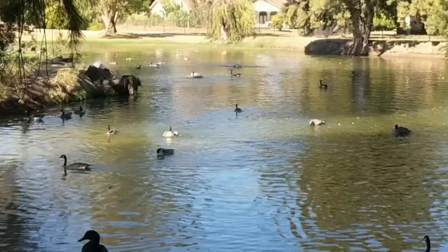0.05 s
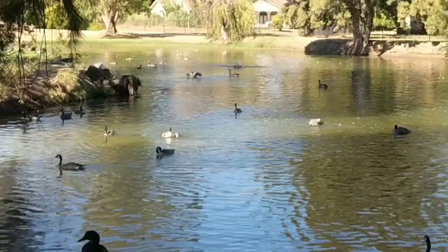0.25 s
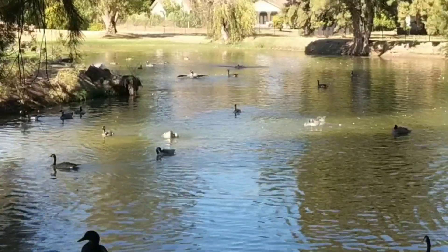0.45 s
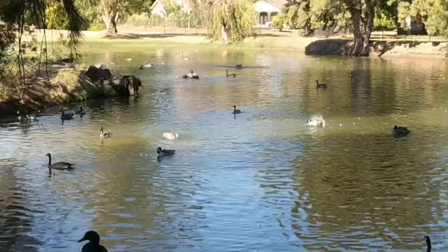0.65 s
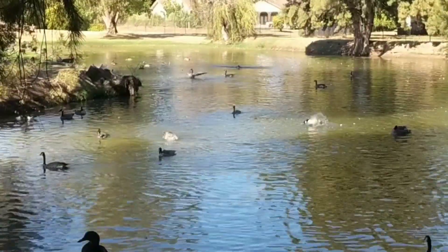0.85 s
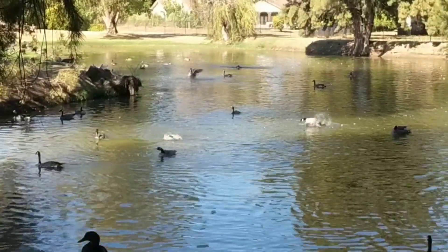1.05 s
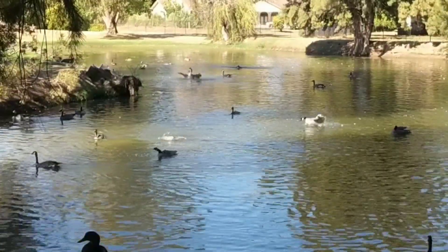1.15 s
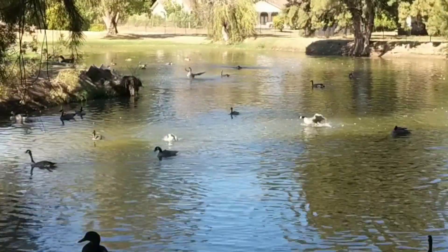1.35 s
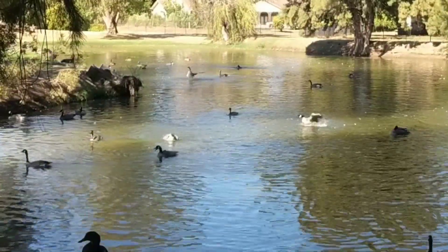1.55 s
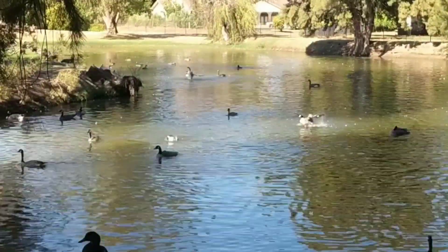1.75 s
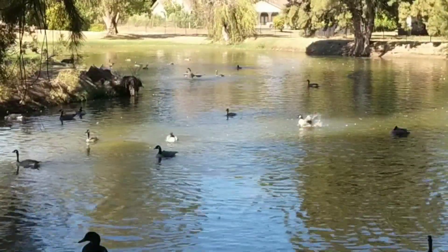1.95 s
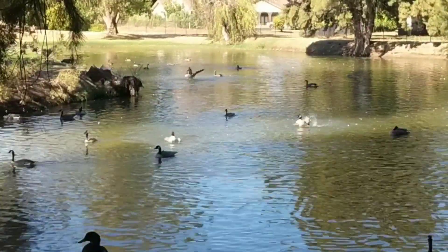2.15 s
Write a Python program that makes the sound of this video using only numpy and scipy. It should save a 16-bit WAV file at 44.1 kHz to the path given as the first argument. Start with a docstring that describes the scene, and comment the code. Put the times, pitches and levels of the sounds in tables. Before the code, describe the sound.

Geese grunt, squeal and honk twice across an outdoor pond, faintly echoed by the banks. Between the honks a bird splashes with light wing slaps, while a faint distant engine hums under quiet background noise.

```python
"""A park pond with geese. Each call starts as a low pulsed grunt that rises, then opens into a nasal honk
or breaks into a clear squeal two octaves up: pulses of the syrinx ringing the throat and bill.
A bathing bird sprays, thumps and slaps the water, and the banks and trees answer the birds.
Under a soft hush a distant engine slowly gains speed, and a puff of wind touches the microphone."""
import sys
import numpy as np
from scipy import signal
from scipy.fft import rfft, irfft, next_fast_len
from scipy.io import wavfile
from scipy.ndimage import uniform_filter1d, map_coordinates

SR = 44100
rng = np.random.default_rng(int(sys.argv[2]) if len(sys.argv) > 2 else 0)


def dump_mix(stems):
    """Bounce the given channels to the path in sys.argv[1] as a 16-bit WAV at rate SR."""
    frames = np.atleast_2d(stems).T  # one column per channel
    limited = np.clip(frames, -1, 1)  # hard clip at full scale
    pcm = np.round(limited * 32767).astype(np.int16)
    wavfile.write(sys.argv[1], SR, pcm)


N = 97020
TOP_HZ = 15700


def amp(db):
    return 10 ** (np.asarray(db) / 20)


def unit(x):
    return x / np.sqrt(np.mean(x ** 2) + 1e-20)


def along(points, hz):
    """Read (f/Hz, value) points on a log frequency axis."""
    f, v = np.transpose(points)
    return np.interp(np.log(hz + 1), np.log(f + 1), v)


def clock():
    return np.arange(N) / SR


def curves(rows):
    """One curve for each column after the time."""
    times, *columns = np.transpose(rows)
    return [np.interp(clock(), times, column) for column in columns]


def wobble(rate):
    """A smooth random curve, rate knots a second."""
    return map_coordinates(rng.standard_normal(int(N * rate / SR) + 4), [np.arange(N) * rate / SR])


def filtered(x, response):
    """Filter x by a function of frequency."""
    size = 2 * next_fast_len(N)
    return irfft(rfft(x, size) * response(np.fft.rfftfreq(size, 1 / SR)), size)[:N]


def coloured(x, points):
    """x through an EQ curve (f/Hz, level/dB), at rms 1."""
    return unit(filtered(x, lambda hz: amp(along(points, hz))))


def causal(gain):
    """The minimum-phase response with this gain: it rings only after it is struck."""
    cepstrum = irfft(np.log(np.maximum(gain, 1e-6)))
    half = len(cepstrum) // 2
    cepstrum[1:half] *= 2
    cepstrum[half + 1:] = 0
    return np.exp(rfft(cepstrum))


def body_share(hz):
    """Crossover from a call's body (1) to its treble rasp (0)."""
    return 1 / (1 + (hz / 2900) ** 8)


def band_gains(throat):
    """How much the throat passes in the body band and in the rasp band."""
    hz = np.linspace(0, SR / 2, 4097)
    power = amp(along(throat, hz)) ** 2
    return [np.sqrt(np.mean(power * (hz > lo) * (hz < hi))) for lo, hi in [(450, 1900), (3500, 8000)]]


def hush():
    """A dark bed of outdoor noise, gently wavering."""
    colour = [(20, -25), (30, -47), (48, -5.5), (70, -0.5), (95, -4), (125, -2.5), (175, -2.5), (260, -12),
              (370, -19.5), (540, -11.5), (760, -15), (1450, -16), (1850, -19.5), (2700, -20.5),
              (6900, -29), (9000, -30.5), (15500, -40.5)]  # outdoor spectrum: f/Hz, level/dB
    return amp(-53 + .7 * wobble(6.9)) * coloured(rng.standard_normal(N), colour)


def engine():
    """A distant engine hums at its rising firing rate, with two weaker partials above."""
    run_up = [(0, 100.4, -51), (.15, 106.8, -52.5), (.42, 110.5, -57), (.52, 113, -49), (.75, 116.6, -50.5),
              (.82, 115.3, -70), (.93, 118.1, -53.5), (1.3, 121.1, -56.5), (1.55, 126.8, -55),
              (1.85, 129.9, -58), (2.2, 139.7, -54)]  # engine speed and loudness: t/s, firing rate/Hz, level/dB
    rate, level_db = curves(run_up)
    phase = 2 * np.pi * np.cumsum(rate * (1 + .004 * wobble(18.36))) / SR
    hum = np.sin(phase) + amp(-8.5) * np.sin(1.45 * phase) + amp(-18) * np.sin(2 * phase)
    return amp(level_db + 1.5 * wobble(14.4)) * unit(hum)


def spray(drops_per_s=4000):
    """Droplets thrown by the bathing bird patter down as tiny clicks of uneven size."""
    swells = [(0, -83), (.3, -65), (.8, -71), (.87, -60.5), (.98, -57), (1.08, -60.5), (1.18, -59),
              (1.25, -63), (1.45, -64), (1.53, -51.5), (1.65, -69.5), (1.76, -57.5), (1.95, -52),
              (2.0, -69), (2.11, -54.5), (2.2, -62)]  # spray envelope: t/s, level/dB
    colour = [(150, 6), (280, 13.5), (420, -1), (650, 4.5), (1400, 1), (2200, -3), (4500, -4.5), (9000, -7),
              (15000, -24)]  # droplet spectrum: f/Hz, level/dB
    drops = (rng.random(N) < drops_per_s / SR) * rng.standard_normal(N)
    drops *= amp(np.minimum(rng.exponential(size=N), 4))
    level_db, = curves(swells)
    return coloured(drops, colour) * amp(level_db + 3 * wobble(30.9))


def syrinx_buzz(rows, throat, follow, jitter, shimmer_db, smear_rad, rough, hiss, crack):
    """The syrinx buzzes and puffs air through a throat that follows the pitch (0 = still, 1 = in step)."""
    t = clock()
    start, end = rows[0][0], rows[-1][0]
    pitch, body_db, rasp_db = curves(rows)
    pitch = uniform_filter1d(pitch, size=300)
    gate = np.clip(np.minimum(t - start, end - t) / .004 + .5, 0, 1)
    on = gate > 0
    cycles = np.cumsum(pitch * (1 + jitter * wobble(250)) * on) / SR
    body_gain, rasp_gain = band_gains(throat)
    body = gate * amp(body_db) / body_gain
    rasp = gate * amp(rasp_db) / rasp_gain

    harmonic = np.arange(1, 100)[:, None]
    partial_hz = harmonic * pitch[on]
    throat_hz = partial_hz * (pitch[np.argmax(body_db)] / pitch[on]) ** follow
    hz = np.linspace(0, SR / 2, 4097)
    throat_phase = np.unwrap(np.angle(causal(amp(along(throat, hz)))))
    lag = np.interp(throat_hz, hz, throat_phase) + smear_rad * rng.standard_normal(harmonic.shape)
    balance = body[on] * body_share(partial_hz) + rasp[on] * (1 - body_share(partial_hz))
    weight = amp(along(throat, throat_hz)) * balance * (partial_hz < TOP_HZ)
    partials = weight * np.cos(2 * np.pi * harmonic * cycles[on] + lag)
    buzz = np.zeros(N)
    buzz[on] = 2 * np.sqrt(pitch[on] / SR) * partials.sum(axis=0)

    air = unit(rng.standard_normal(N) * np.exp(-2 * (cycles % 1)) * gate) * np.sqrt(np.mean(gate))
    air *= 1 + crack * np.exp(-np.abs(t - start) / .022)  # hoarse for a moment as the voice breaks
    low_air = filtered(air, lambda f: amp(along(throat, f)) * body_share(f))
    high_air = filtered(air, lambda f: amp(along(throat, f)) * (1 - body_share(f)))
    return buzz * amp(shimmer_db * wobble(200)) + rough * body * low_air + hiss * rasp * high_air


def grunts():
    """Low, breathy buzzes of the syrinx lead into the honks and squeals."""
    calls = [
        [(.11, 155.5, -60, -95), (.16, 174.9, -55, -74), (.226, 180, -47.5, -66), (.232, 207, -42, -63),
         (.25, 213.4, -45.5, -62), (.262, 216, -48, -70)],
        [(.245, 159, -43, -68), (.275, 158.5, -45, -63), (.325, 159.5, -43.5, -64), (.345, 167, -42, -58),
         (.36, 178, -39.5, -58), (.38, 181, -37, -53), (.395, 186, -33.5, -52), (.407, 184, -50, -58)],
        [(.488, 171, -63, -66), (.498, 171.2, -45, -66), (.543, 176.6, -48, -62), (.567, 190.2, -40.5, -60),
         (.575, 188, -43, -47)],
        [(1.265, 172, -59, -92), (1.295, 165.9, -48, -66), (1.315, 165.4, -43, -62), (1.335, 177.8, -43, -61),
         (1.355, 188.6, -53, -60), (1.38, 200.6, -46, -59), (1.4, 201.5, -63, -70), (1.425, 202, -56, -74),
         (1.445, 187, -60, -76)],
        [(1.742, 184, -54, -66), (1.762, 172, -45.5, -63), (1.783, 169.5, -48.5, -68), (1.812, 174, -44, -60),
         (1.82, 181, -46, -58)],
    ]  # one contour a grunt: t/s, pitch/Hz, body/dB, rasp/dB
    # throat resonances with the bill nearly shut, in a plain grunt, and opening: f/Hz, level/dB
    shut = [(300, -68), (430, -7.5), (530, 1), (700, 2.5), (850, -7.5), (1050, 8), (1300, -5.5), (1550, -6),
            (1900, -22), (2300, -4.5), (2700, -14), (3300, -23), (4400, -18), (6000, -17), (8000, -16),
            (15000, -36)]
    plain = [(300, -34), (430, -7), (520, -6.5), (680, 2.5), (850, -14), (1000, 5), (1110, 6), (1280, -3),
             (1460, 8), (1650, -11), (1950, -17), (2300, -9), (2700, -9.5), (3300, -21), (4400, -14.5),
             (6000, -13), (8000, -38), (15000, -35)]
    opening = [(300, -35.5), (520, -2.5), (700, 3), (870, -3.5), (1220, 0.5), (1450, 5.5), (1750, -11),
               (2700, -21), (3300, -14), (4400, -6), (6000, -9), (15000, -30)]
    return sum(syrinx_buzz(rows, throat, follow=.15, jitter=.006, shimmer_db=1, smear_rad=1.4,
                           rough=.28, hiss=.54, crack=0)
               for rows, throat in zip(calls, [shut, plain, opening, opening, opening]))


def squeals():
    """The voice cracks and jumps two octaves to a clear, steady tone."""
    calls = [
        [(.246, 745, -46, -66), (.254, 756, -42, -71), (.275, 756, -42, -61), (.3, 750, -47, -73),
         (.32, 725, -57, -72)],
        [(.395, 822, -34, -37), (.403, 824.4, -34, -33.5), (.424, 824.4, -35, -33.5), (.44, 822, -36, -40),
         (.453, 819, -37, -45), (.459, 780, -44, -66), (.476, 765, -49, -68)],
        [(1.376, 805, -45, -70), (1.386, 816, -41, -69), (1.401, 816, -41, -70), (1.42, 770, -56, -76)],
    ]  # one contour a squeal: t/s, pitch/Hz, body/dB, rasp/dB
    # throat resonances in a soft and a loud squeal: f/Hz, level/dB
    soft = [(400, -13), (780, -6.5), (1560, -4.5), (2300, -12), (3100, -53), (4100, -4), (5000, -25),
            (6000, -11), (9000, -20), (15000, -47)]
    loud = [(400, -26), (800, -3), (1650, 3), (2450, -9), (3300, -16), (4130, -7.5), (4950, 0.5), (5780, 1),
            (6600, -10), (7430, -18), (9080, -13), (10700, -24.5), (12400, -19.5), (14000, -21),
            (14900, -31), (15700, -48)]
    return sum(syrinx_buzz(rows, throat, follow=.3, jitter=.0008, shimmer_db=.4, smear_rad=.8,
                           rough=.07, hiss=.07, crack=2.5)
               for rows, throat in zip(calls, [soft, loud, soft]))


def wind_puff(peak_s=.35, width_s=.075):
    """One puff of wind rumbles on the microphone."""
    colour = [(20, -29), (45, -0.5), (80, 0), (120, -1), (200, -39), (600, -66)]  # rumble spectrum: f/Hz, level/dB
    swell = np.exp(-np.abs(clock() - peak_s) / width_s)
    return amp(-41.5) * swell * coloured(rng.standard_normal(N), colour)


def syrinx_snaps(rows, throat, follow, stumbles, jitter_s, uneven_db, breath):
    """Separate snaps of the syrinx, each trailed by a puff of air, ring a throat that moves with pitch."""
    t = clock()
    pitch, body_db, rasp_db = curves(rows)
    cycles = np.cumsum(pitch * (t >= rows[0][0]) * (t < rows[-1][0])) / SR
    pulse = np.arange(int(cycles[-1]) + 1)
    slip = .25 * np.minimum(pulse // 3, stumbles)  # at first, every third gap is a quarter period short
    starts = np.searchsorted(cycles, pulse - slip, side="right")
    size = 2048
    hz, age = np.fft.rfftfreq(size, 1 / SR), t[:size]
    body_gain, rasp_gain = band_gains(throat)
    voice = np.zeros(N)
    for i in starts[starts < N - size]:
        throat_hz = hz * (pitch[np.argmax(body_db)] / pitch[i]) ** along(follow, hz)
        body = amp(body_db[i]) / body_gain * body_share(hz)
        rasp = amp(rasp_db[i] + uneven_db * rng.normal()) / rasp_gain * (1 - body_share(hz))
        resonance = causal(amp(along(throat, throat_hz)) * (body + rasp))
        puff = rng.standard_normal(size) * np.exp(-2 * age * pitch[i])
        air = rfft(puff / np.linalg.norm(puff)) * along(breath, hz)
        snap = np.exp(-2j * np.pi * hz * jitter_s * rng.normal())
        ring = np.roll(irfft((snap + air) * resonance), 8) * (age < age[-1] / 2)
        voice[i:i + size] += np.sqrt(SR / pitch[i]) * ring
    return voice


def honks():
    """Two full nasal honks; the first is hoarser, with more stumbling pulses and more breath."""
    # honk contours: t/s, pitch/Hz, body/dB, rasp/dB
    first = [(.575, 200, -35, -46), (.585, 203, -34.5, -43), (.594, 215, -34, -41), (.616, 213, -36, -41.5),
             (.635, 207, -38.5, -49), (.648, 196, -43, -58), (.67, 185, -54, -62)]
    last = [(1.82, 192, -37, -54), (1.831, 199, -33, -41), (1.85, 204, -32, -38), (1.872, 199, -34, -40),
            (1.885, 191, -38, -41.5), (1.902, 180, -42, -53), (1.925, 169, -52, -66)]
    # throat and bill resonances: f/Hz, level/dB
    first_throat = [(300, -30.5), (450, -23), (600, 6.5), (850, 5.5), (1060, -22), (1250, 10), (1480, 12.5),
                    (1720, 1), (1920, -14.5), (2120, 2.5), (2350, -13), (2750, -9), (3350, -24.5),
                    (4000, -17), (4500, -10.5), (5100, -19.5), (6200, -12), (6900, -16), (7500, -23),
                    (9700, -28), (11000, -38), (15000, -44)]
    last_throat = [(300, -22), (450, -26), (590, -4), (810, -0.5), (1000, -15), (1200, -6), (1410, 8),
                   (1620, 2), (1820, -19), (2200, -11), (2600, -32), (3050, -21), (3350, -33), (4000, -20),
                   (4650, -10), (5000, -20), (6200, -13), (6900, -21), (7600, -38), (8400, -26),
                   (9900, -28), (10900, -40), (12500, -37), (15000, -56)]
    # how far the resonances follow the pitch: f/Hz, exponent (0 = still, 1 = in step)
    first_follow = [(1500, 0.94), (6000, 0.54)]
    last_follow = [(1500, .6), (4500, 1.6), (6300, .4)]
    hoarse = syrinx_snaps(first, first_throat, first_follow, stumbles=4, jitter_s=.00001, uneven_db=1.8,
                          breath=[(1500, .09), (5000, .32)])  # f/Hz, gain of the puff
    cleaner = syrinx_snaps(last, last_throat, last_follow, stumbles=1, jitter_s=0, uneven_db=.9,
                           breath=[(1500, .07), (5000, .17)])
    return amp(-1) * hoarse + amp(-1.17) * cleaner


def plunges():
    """The bathing bird thumps the water: short, dull pulses of low tone."""
    thumps = [(.906, 181, -45.5, 0.014), (1.014, 142, -50, 0.012), (1.11, 122.1, -51.5, 0.028),
              (1.236, 133.5, -33, 0.0034), (1.435, 148.6, -38.5, 0.0036), (1.939, 166.6, -46.5, 0.0058)]  # plunges into the water: t/s, f/Hz, level/dB, width/s
    t = clock()
    return sum(amp(db) * np.exp(-.5 * ((t - at) / width) ** 2) * np.sin(2 * np.pi * hz * (at - t))
               for at, hz, db, width in thumps)


def wing_slaps(rise_s=.0008, splash_db=-17, splash_s=.0091):
    """Wings smack the pond in sharp noise bursts, with a softer splash flying around each."""
    hits = [(1.036, -50, .02), (1.363, -44, .04), (1.5553, -41, .018), (1.7375, -39.5, .015)]  # wing strokes: t/s, level/dB, 60 dB decay/s
    colour = [(150, -20), (700, 0), (1500, 0), (3000, 0), (5500, -4), (9000, -11), (15000, -26)]  # slap spectrum: f/Hz, level/dB
    t = clock()
    envelope = np.zeros(N)
    for at, db, decay in hits:
        attack = np.clip((t - at) / rise_s + 1, 0, 1)
        smack = amp(db - 60 * np.abs(t - at) / decay) * attack
        splash = amp(db + splash_db) * np.exp(-np.abs(t - at) / splash_s)
        envelope += smack + splash
    return envelope * coloured(rng.standard_normal(N), colour)


def shore(x, near_s=.05, far_s=.0801, trees_db=-19):
    """Two banks each send back an echo, and the trees add a thin tail."""
    # what each bank reflects: f/Hz, level/dB
    near_bank = [(600, -43), (1500, -20), (2500, -23), (3300, -7), (4130, -13), (4500, -21), (4950, -10.5),
                 (5800, -42), (6700, -18), (10000, -17), (14000, -36)]
    far_bank = [(600, -35), (1600, -26), (3300, -17), (4130, -12), (4500, -31), (4950, -18), (6000, -41),
                (14000, -34)]
    trees = [(200, 0.48), (1500, 0.48), (5000, 0.88), (12000, 0.05)]  # reverb among the trees: f/Hz, 60 dB decay/s
    hz, t, noise = signal.stft(rng.standard_normal(SR // 2), SR, nperseg=256)
    tail = signal.istft(noise * amp(-60 * t / along(trees, hz)[:, None]), SR, nperseg=256)[1]
    echoes = sum(filtered(x, lambda f: amp(along(bank, f)) * np.exp(-2j * np.pi * f * delay))
                 for delay, bank in [(near_s, near_bank), (far_s, far_bank)])
    return echoes + amp(trees_db) * signal.fftconvolve(x, tail / np.linalg.norm(tail))[:N]


def scene():
    """The birds and their echoes over the dry background, in mono."""
    geese = amp(-1.87) * grunts() + honks() + amp(-2.5) * squeals()
    birds = geese + wing_slaps() + plunges() + spray()
    return (birds + shore(birds) + engine() + wind_puff() + hush())[None]


def record(dry):
    """A brick-wall low-pass takes off the highest treble."""
    return np.array([filtered(x, lambda hz: hz < TOP_HZ) for x in dry])


dry = scene()
out = record(dry)
dump_mix(out)
```